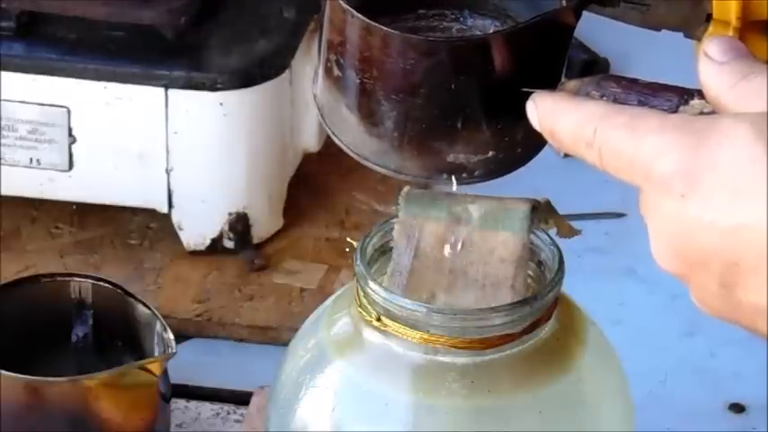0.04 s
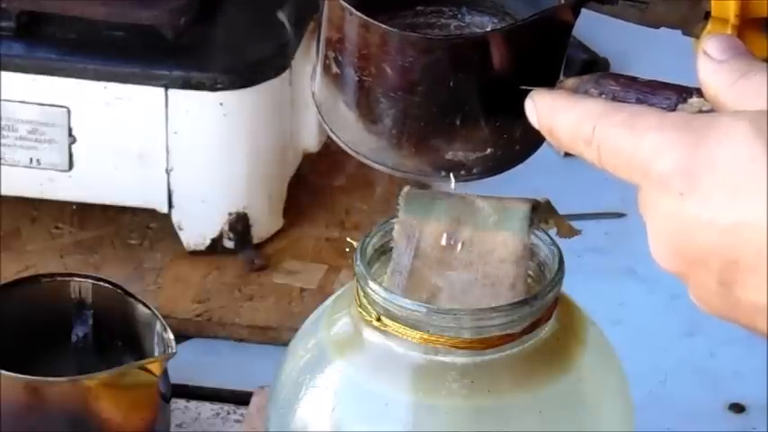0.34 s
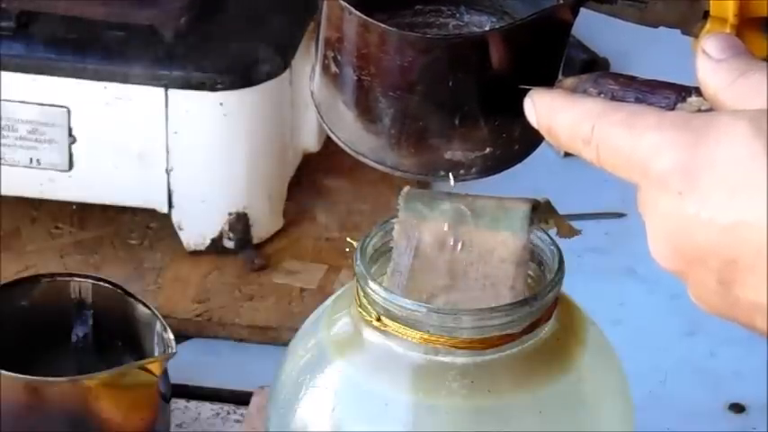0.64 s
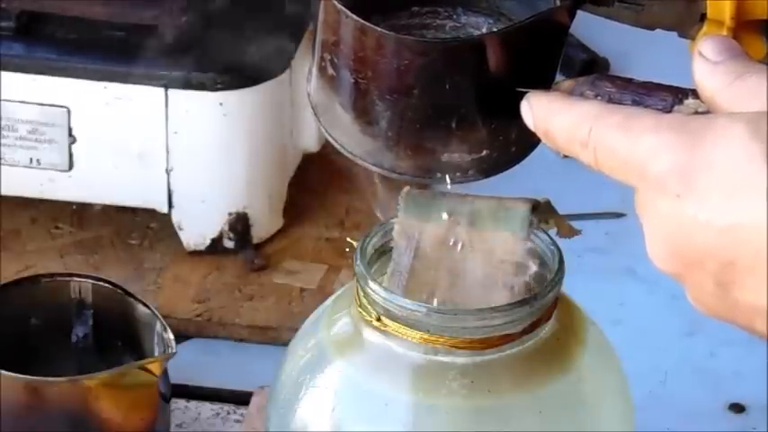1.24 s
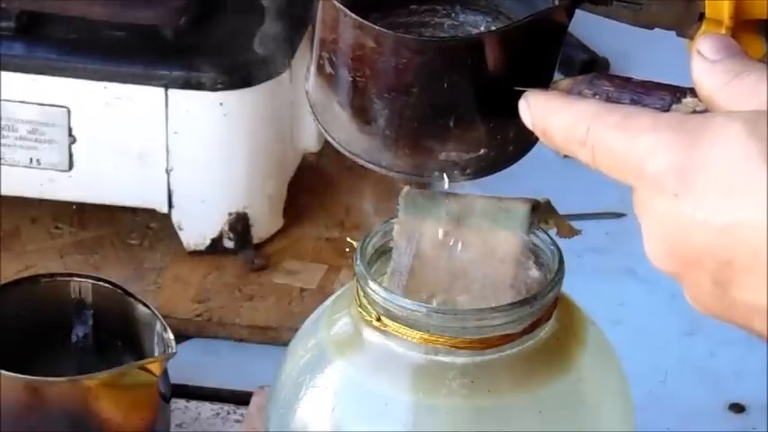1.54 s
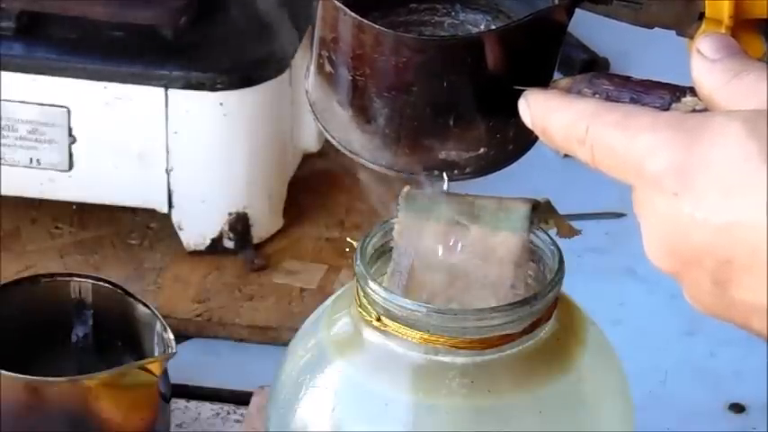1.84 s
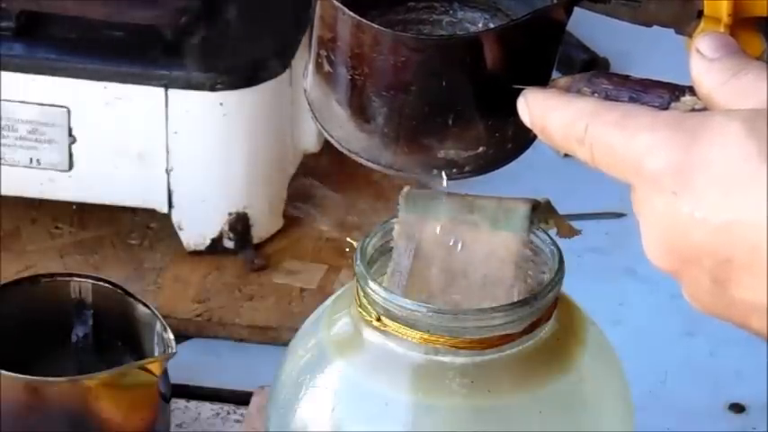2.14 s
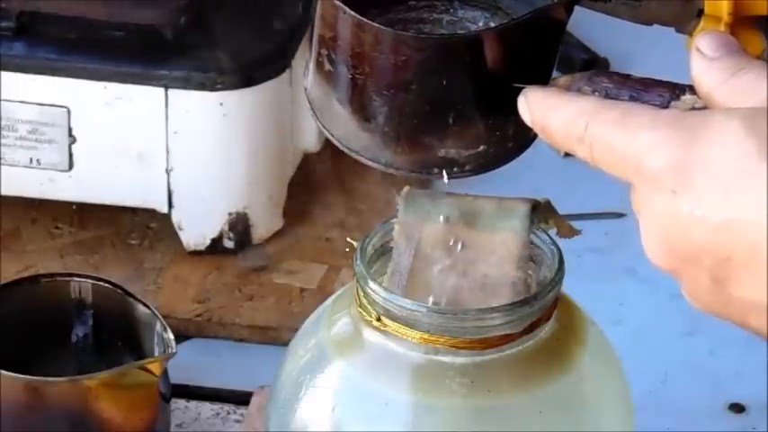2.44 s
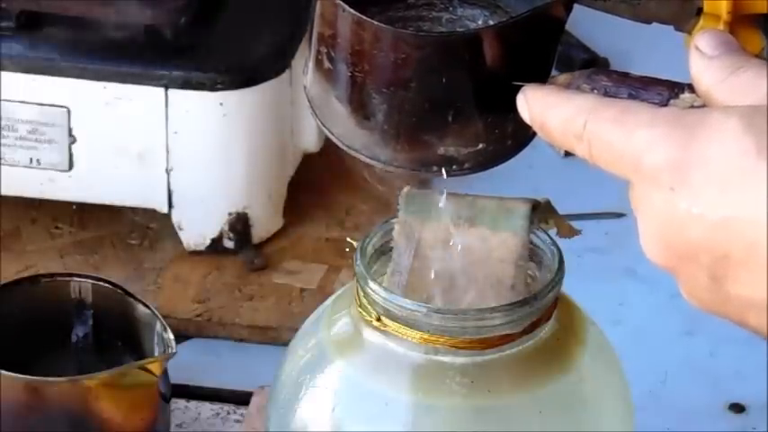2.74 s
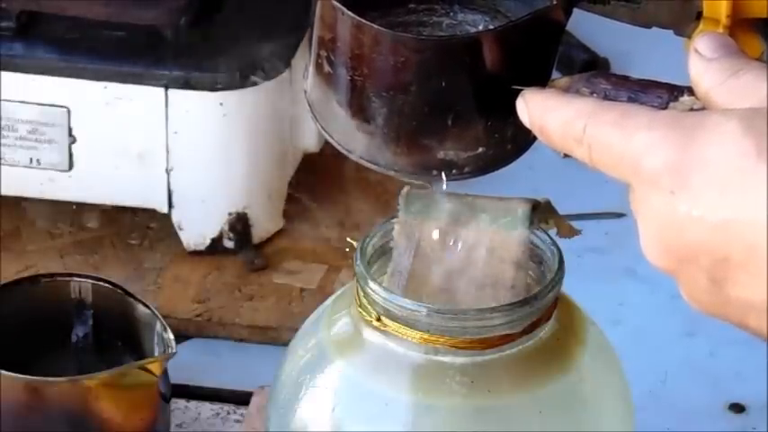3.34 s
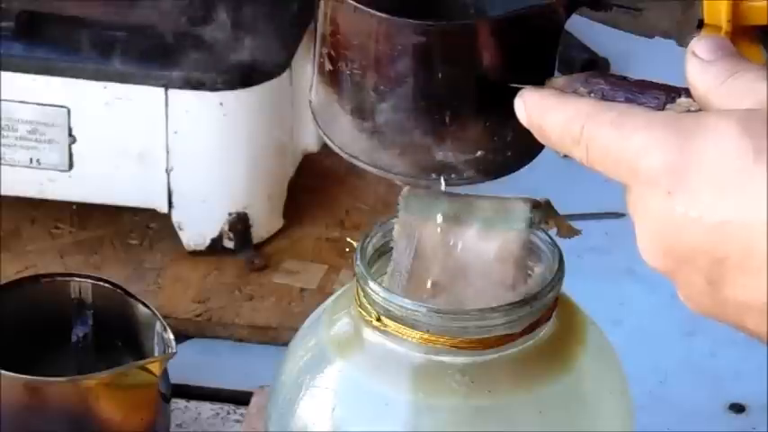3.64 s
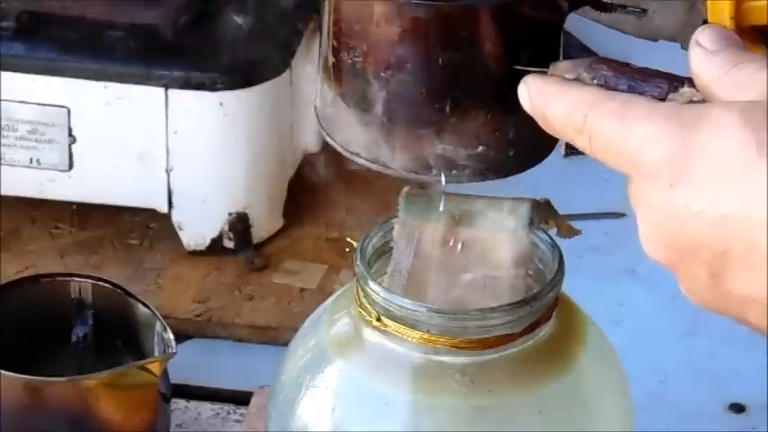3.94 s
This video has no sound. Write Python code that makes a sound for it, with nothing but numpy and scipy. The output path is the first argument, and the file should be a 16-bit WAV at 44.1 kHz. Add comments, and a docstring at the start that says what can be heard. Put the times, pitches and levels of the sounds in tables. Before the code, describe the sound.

Liquid in a jar sizzles, spits and bubbles under fast drops of hot metal.

```python
"""Molten metal drips, about ten drops a second, into liquid in a big glass jar on a workbench.
The drops flash off spitting puffs of steam and set off clusters of small bubbles that sink in pitch.
Some bubbles snap sharply and the liquid sizzles on between drops; the jar rings, nearby things echo.
A few brief, faint tones ring near 5 kHz, and the workshop adds a soft rush.
Now and then a noise suppressor chokes the hiss for an instant and leaves a few partials ringing."""
import sys
import numpy as np
from scipy import signal
from scipy.fft import rfft, irfft
from scipy.io import wavfile
from scipy.ndimage import uniform_filter1d, minimum_filter1d

SR = 44100
rng = np.random.default_rng(int(sys.argv[2]) if len(sys.argv) > 2 else 0)


def digitize_waveform(pressure):
    """Quantize a signal to 16-bit integers and store it at the path in sys.argv[1].

    Rows of a 2-D input are taken as channels; values are limited to [-1, 1].
    """
    field = np.atleast_2d(pressure).T
    bounded = np.clip(field, -1, 1)
    quanta = np.round(bounded * 32767).astype(np.int16)
    wavfile.write(sys.argv[1], SR, quanta)


N = 176400
TIME_S = np.arange(N) / SR
FREQ_HZ = np.arange(N + 1) * SR / (2 * N)
TOP_HZ = 14250

# Steam puffs. Each row: middle in seconds, relative level in dB, length in seconds.
STEAM_PUFFS = [(0.018, -46.5, 0.033), (0.131, -45, 0.022), (0.182, -49.5, 0.011), (0.237, -47, 0.017),
               (0.297, -52, .014), (0.351, -44.5, 0.018), (0.452, -45.5, 0.026), (0.542, -43.5, 0.028),
               (0.644, -42.5, 0.02), (0.748, -46.5, 0.023), (.866, -46, 0.0065), (0.974, -47.5, 0.01),
               (1.082, -47.5, 0.035), (1.191, -46.5, 0.018), (1.27, -51, 0.03), (1.367, -43.5, 0.014),
               (1.479, -43.5, 0.014), (1.562, -49.5, 0.029), (1.666, -46.5, 0.036), (1.736, -46.5, 0.023),
               (1.799, -49, .014), (1.844, -48, 0.019), (2.027, -51, 0.013), (2.145, -51, 0.02),
               (2.243, -43.5, 0.033), (2.32, -43.5, 0.0074), (2.36, -48.5, 0.03), (2.432, -47.5, 0.029),
               (2.568, -46.5, 0.018), (2.677, -47, 0.017), (2.788, -46.5, 0.021), (2.885, -46, 0.013),
               (2.948, -50, 0.0093), (3.005, -47.5, 0.029), (3.056, -50, 0.013), (3.116, -44.5, 0.016),
               (3.227, -50, 0.015), (3.289, -48.5, 0.037), (3.433, -45, 0.019), (3.552, -45, 0.026),
               (3.635, -48.5, 0.03), (3.791, -46, 0.03), (3.881, -45.5, 0.023), (3.995, -46, 0.016)]
# Bubble clusters. Each row: middle in seconds, relative level in dB, pitch in Hz, length in seconds.
BUBBLE_CLUSTERS = [(0.009, -51, 2280, 0.014), (0.089, -48.5, 2650, 0.035), (0.127, -55, 2400, 0.011),
                   (0.189, -48.5, 2700, .033), (0.247, -51.5, 2730, 0.013), (0.333, -49.5, 2840, 0.043),
                   (0.423, -54, 2610, 0.05), (.505, -56, 1700, .02), (0.536, -52, 2830, 0.042),
                   (0.604, -53.5, 2170, 0.026), (0.742, -52, 2230, 0.051), (.825, -50.5, 2400, .018),
                   (0.881, -49, 2510, 0.014), (0.949, -50, 2770, 0.064), (1.059, -49.5, 2940, 0.037),
                   (1.086, -53, 3000, 0.03), (1.151, -48, 2980, 0.019), (1.203, -51.5, 2350, 0.017),
                   (1.266, -51, 2770, 0.048), (1.335, -49.5, 2540, 0.017), (1.421, -53, 1660, 0.015),
                   (1.444, -51, 2410, 0.033), (1.494, -54.5, 2730, 0.013), (1.562, -48.5, 2710, 0.018),
                   (1.632, -52, 2660, 0.018), (1.681, -45.5, 2440, .022), (1.781, -51.5, 2500, 0.053),
                   (1.858, -51, 2900, 0.013), (1.91, -52.5, 2410, 0.041), (1.987, -50.5, 2860, 0.036),
                   (2.045, -51.5, 2830, .011), (2.133, -50.5, 2780, 0.057), (2.211, -51.5, 2090, 0.027),
                   (2.403, -52, 2250, .035), (2.533, -57.5, 1490, 0.022), (2.571, -61, 2540, 0.058),
                   (2.727, -55, 1664, 0.024), (2.746, -56, 2460, 0.026), (2.834, -55.5, 2400, 0.023),
                   (2.902, -52, 2330, 0.02), (3.02, -56.5, 2530, 0.026), (3.065, -50.5, 2450, 0.025),
                   (3.231, -56.5, 2480, 0.044), (3.283, -58, 2240, 0.015), (3.326, -48, 2820, .012),
                   (3.37, -52, 1920, 0.03), (3.438, -55, 2500, 0.031), (3.568, -52, 2410, 0.011),
                   (3.603, -55.5, 1600, 0.023), (3.7, -55, 2230, 0.037), (3.799, -58, 2590, 0.031),
                   (3.909, -44, 4480, 0.013), (3.923, -52, 3320, .025), (3.945, -53, 2170, .03)]
# Collapsing bubbles. Each row: start in seconds, relative peak in dB, pitch in Hz.
BUBBLE_SNAPS = [(.0677, -29, 2360), (.0857, -28, 2350), (.2135, -28, 2420), (.753, -28, 2860),
                (.8185, -29, 2200), (.8712, -31, 2500), (1.1498, -30, 2850), (1.3698, -22, 12900),
                (1.4178, -27.5, 2380), (1.4691, -25, 12600), (1.4898, -21, 13200), (1.5549, -27, 2680),
                (1.564, -22, 13000), (1.5698, -21.5, 13200), (1.6656, -14.3, 2430), (1.671, -22, 12500),
                (1.686, -23, 3060), (1.9488, -28, 2430), (2.1357, -27, 2310), (2.5415, -32, 2420),
                (2.8913, -32, 2580), (2.906, -29, 2190), (3.057, -31, 2420), (3.3164, -28, 3100),
                (3.5503, -32, 2500), (3.6639, -31, 2650), (3.895, -31, 2570)]
# Brief, faint ringing tones near 5 kHz. Each row: start in seconds, level in dB, pitch in Hz.
HIGH_PINGS = [(2.342, -50, 4970), (2.776, -48.5, 4730), (2.811, -48, 4980), (3.177, -47.5, 4750),
              (3.24, -54.5, 4860), (3.285, -51.5, 4670)]
# Jar resonances. Each row: centre in Hz, width in Hz, boost in dB.
JAR_MODES = [(1365, 30, 6), (1462, 36, 8), (1693, 40, 7), (1785, 30, 4), (2002, 30, 5), (2168, 50, 5),
             (2236, 24, 6), (2340, 70, 3), (2778, 30, 4), (2866, 40, 7), (3053, 40, 6), (3192, 20, 6),
             (3243, 22, 6), (3395, 65, 6), (3570, 36, 5), (4208, 30, 6), (4638, 28, 7), (5000, 90, 4),
             (7872, 45, 6), (11165, 40, 6), (11480, 80, 3), (11850, 100, 4), (12796, 50, 6), (13185, 50, 6),
             (13360, 55, 5)]
# Noise spectra. Each row: frequency in Hz, relative density in dB.
STEAM_SPECTRUM = [(500, -16), (2000, -11), (4000, -8), (6000, -9.5), (8000, -2.5), (10000, -1.5),
                  (11500, 0), (12700, 4), (14200, 2.5)]
SIZZLE_SPECTRUM = [(400, -20.5), (1050, -2), (1500, -2.5), (2300, 1.5), (3200, -2), (3800, -1), (4800, 0.5),
                   (5800, -1.5), (8000, -1.5), (10500, 0), (12700, 1), (14200, 1)]
WORKSHOP_SPECTRUM = [(20, -6.5), (32, 6.5), (55, -1), (150, 0.5), (250, -1), (500, -1.5), (800, -1.5),
                     (1100, -9), (2000, -8.5), (6000, -35.5)]
# Suppressor bites. Each row: middle in seconds, depth in dB.
SUPPRESSOR_BITES = [(.036, 19), (.231, 15), (.423, 15), (.464, 19), (1.04, 16), (1.722, 17), (1.765, 19),
                    (1.913, 17), (2.364, 18), (2.619, 15), (2.724, 11), (2.788, 18), (2.83, 15),
                    (3.119, 55), (3.194, 14), (3.236, 13), (3.3, 12), (3.938, 12)]


def steam(gain_db=4):
    """Each drop boils off a short, bright swell of spits."""
    power = sum(undb(db) ** 2 * bell(TIME_S - mid_s, length_s) for mid_s, db, length_s in STEAM_PUFFS)
    spits = spitting(rate_per_s=1500, scatter_db=1, share=1)
    return undb(gain_db) * colour(np.sqrt(power) * spits, STEAM_SPECTRUM)


def bubble_clusters(count=40, gain_db=3, scatter_db=4.5, scatter_oct=.11, sink_oct_per_s=7, skew=.2):
    """Clusters of quickly damped bubbles; the later ones are bigger and lower."""
    out, t = np.zeros(N), TIME_S[:SR // 100]
    for mid_s, db, hz, length_s in BUBBLE_CLUSTERS:
        cluster = np.zeros(N)
        for when, detune, size in rng.standard_normal((count, 3)):
            lag_s = (when + skew * (when ** 2 - 1)) * length_s / 2  # abrupt start, long tail
            pitch_hz = hz * 2 ** (scatter_oct * detune - sink_oct_per_s * lag_s)
            add(cluster, mid_s + lag_s, undb(scatter_db * size) * bubble(t * pitch_hz, decay_cycles=3.3))
        out += unit(cluster) * undb(db) * np.sqrt(length_s * SR / N)
    return undb(gain_db) * out


def snaps(gain_db=-7.5, rise_s=.0005, decay_s=.00055):
    """Single vapour bubbles collapse with a tick a few cycles long."""
    out, t = np.zeros(N), TIME_S[:SR // 100]
    envelope = (1 - np.exp(-t / rise_s)) ** 2 * np.exp(-t / decay_s)
    envelope /= envelope.max()
    for start_s, db, hz in BUBBLE_SNAPS:
        add(out, start_s, undb(db + gain_db) * envelope * np.sin(2 * np.pi * hz * t))
    return out


def sizzle(gain_db=-46.5):
    """Fine boiling carries on between the drops."""
    return undb(gain_db) * colour(spitting(rate_per_s=1200, scatter_db=5, share=.57), SIZZLE_SPECTRUM)


def lone_bubbles(count=700, gain_db=-60, scatter_db=4, centre_hz=2003, scatter_oct=.38):
    """Lone bubbles burst throughout and ring a little longer than those in a cluster."""
    out, t = np.zeros(N), TIME_S[:SR // 40]
    starts_s = rng.random(count) * N / SR
    draws = np.clip(rng.standard_normal((count, 2)), -2, 2)
    for start_s, (detune, size) in zip(starts_s, draws):
        pitch_hz = centre_hz * 2 ** (scatter_oct * detune)
        add(out, start_s, undb(scatter_db * size) * bubble(t * pitch_hz, decay_cycles=7.6))
    return undb(gain_db) * unit(out)


def high_pings(partials=6, spread=.075, rise_s=.0054, decay_s=.014):
    """Brief, faint ringing tones near 5 kHz, roughened by the beating of close partials."""
    out, t = np.zeros(N), TIME_S[:SR // 10]
    envelope = (1 - np.exp(-t / rise_s)) * np.exp(-t / decay_s)
    envelope /= envelope.max()
    for start_s, db, hz in HIGH_PINGS:
        draws = rng.standard_normal((partials, 2))
        ring = sum(np.sin(2 * np.pi * (hz * (1 + spread * detune) * t + turn)) for detune, turn in draws)
        add(out, start_s, undb(db) * envelope * ring / np.sqrt(partials))
    return out


def jar(x, base_db=-3.5):
    """The jar lifts its own narrow resonances."""
    boost_db = sum(db / (1 + (2 * (FREQ_HZ - hz) / width_hz) ** 2) for hz, width_hz, db in JAR_MODES)
    return causal_filter(x, base_db + boost_db)


def reflections(x, wet_db=-11, decay_s=.006, gap_s=.002):
    """Quick echoes off the glass, the pot and the bench."""
    t = TIME_S[:SR // 12]
    echoes = rng.standard_normal(len(t)) * np.exp(-t / decay_s) * (t > gap_s)
    wet = signal.fftconvolve(x, echoes / np.linalg.norm(echoes))[:N]
    return (x + undb(wet_db) * wet) / np.hypot(1, undb(wet_db))


def workshop(level_db=-60):
    """Soft, steady rush of the room."""
    return undb(level_db) * colour(rng.standard_normal(N), WORKSHOP_SPECTRUM)


def suppressor(x, size=4096, bite_s=.015, listen_s=.028, threshold_db=6.1, tone_gain_db=2.3):
    """At each listed bite, chokes the hiss and leaves the partials that stand out ringing."""
    tone_min_hz, band_top_hz = 1200, 12800
    out = np.pad(x, size // 2)
    t = (np.arange(size) - size // 2) / SR
    hz = np.arange(size // 2 + 1) * SR / size
    window = bell(t, listen_s)
    for mid_s, depth_db in SUPPRESSOR_BITES:
        piece = out[int(mid_s * SR):][:size]  # a view into out
        magnitude = np.abs(rfft(piece * window))
        threshold = undb(threshold_db) * uniform_filter1d(magnitude, size=301)
        is_tone = (hz > tone_min_hz) & (magnitude > threshold)
        hiss_mask = uniform_filter1d(minimum_filter1d(1. - is_tone, size=5), size=3)
        band = rfft(piece) * (hz < band_top_hz)
        hiss, tones = irfft(band * hiss_mask), irfft(band * (1 - hiss_mask))
        piece += hiss * (undb(-depth_db * bell(t, bite_s)) - 1)
        piece += tones * (undb(tone_gain_db * window) - 1)
    return out[size // 2:][:N]


def spitting(rate_per_s, scatter_db, share, spit_s=.0032):
    """Noise with a share of its power in tiny spits of uneven size."""
    onsets = rng.random(N) < rate_per_s / SR
    sizes = undb(scatter_db * np.minimum(rng.standard_normal(N), 2))
    power = np.convolve(onsets * sizes ** 2, np.hanning(int(spit_s * SR) + 3), "same")
    return rng.standard_normal(N) * np.sqrt(1 - share + share * power / power.mean())


def bubble(cycles, decay_cycles):
    """A bubble pulsates: a damped sine that builds in about one cycle."""
    return np.sin(2 * np.pi * cycles) * np.exp(-cycles / decay_cycles) * (1 - np.exp(-cycles))


def colour(x, spectrum):
    """Filter by (Hz, dB) points; white noise keeps its power, counted below TOP_HZ."""
    hz, db = np.array(spectrum).T
    curve_db = np.interp(np.log(FREQ_HZ + 1), np.log(hz), db)
    power = np.mean(undb(curve_db) ** 2 * (FREQ_HZ < TOP_HZ))
    return causal_filter(x, curve_db - 10 * np.log10(power))


def causal_filter(x, gain_db):
    """Minimum-phase filter, one gain per FREQ_HZ bin."""
    cepstrum = irfft(np.log(undb(gain_db)))
    cepstrum[1:N] *= 2
    cepstrum[N + 1:] = 0
    return irfft(rfft(x, 2 * N) * np.exp(rfft(cepstrum)))[:N]


def bell(t, width_s):
    """Gaussian swell about t = 0, width_s wide at half height."""
    return 2 ** -np.minimum((2 * t / width_s) ** 2, 60)


def add(out, start_s, sound):
    """Mix a short sound in at start_s."""
    i = int(start_s * SR)
    if 0 <= i < N:
        out[i:i + len(sound)] += sound[:N - i]


def undb(db):
    """Decibels to gain."""
    return 10 ** (np.asarray(db) / 20)


def unit(x):
    """Scale to an rms of 1."""
    return x / np.sqrt(np.mean(x ** 2) + 1e-30)


def scene():
    """The boiling jar over the workshop's rush, mono."""
    room = workshop()
    boiling = steam() + bubble_clusters() + snaps() + sizzle() + lone_bubbles()
    return (reflections(jar(boiling)) + high_pings() + room)[None]


def record(dry, edge_hz=100):
    """Noise suppressor, then a steep low-pass at TOP_HZ."""
    low_pass = np.clip((TOP_HZ - FREQ_HZ) / edge_hz + .5, 0, 1)
    return irfft(rfft(suppressor(dry[0]), 2 * N) * low_pass)[None, :N]


dry = scene()
out = record(dry)
digitize_waveform(out)
```